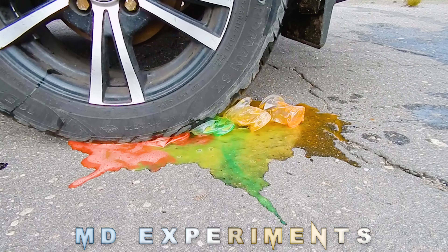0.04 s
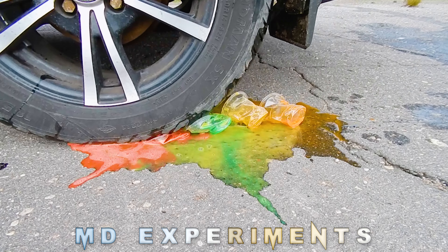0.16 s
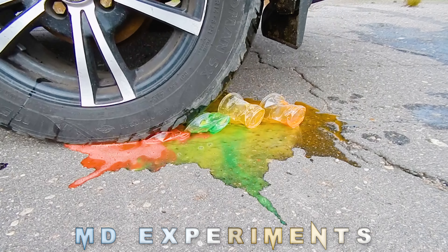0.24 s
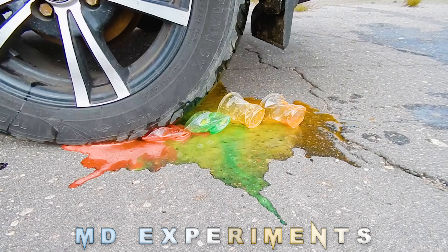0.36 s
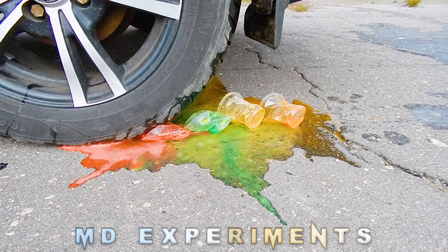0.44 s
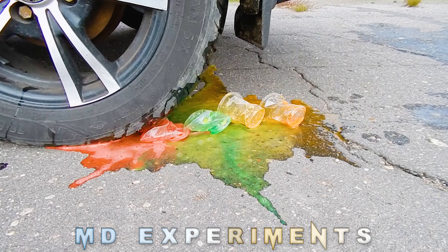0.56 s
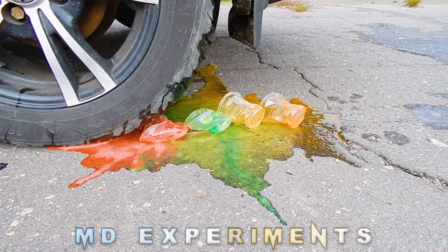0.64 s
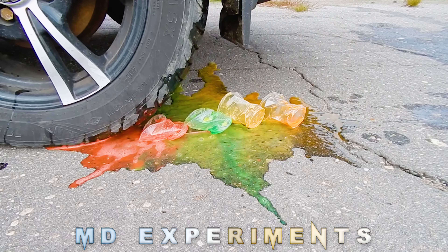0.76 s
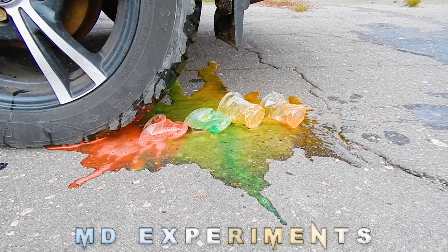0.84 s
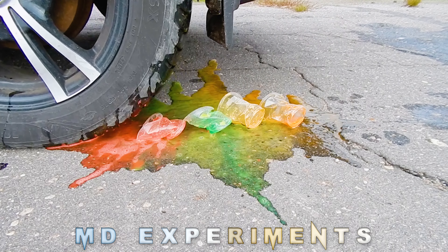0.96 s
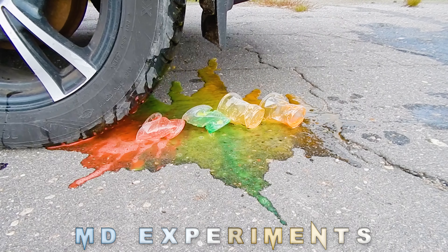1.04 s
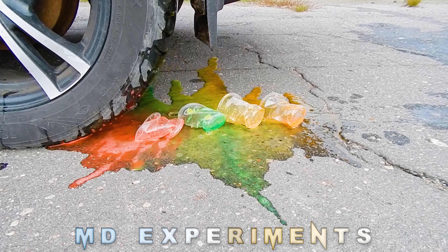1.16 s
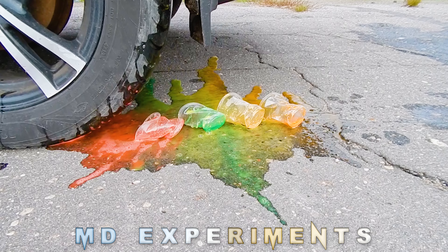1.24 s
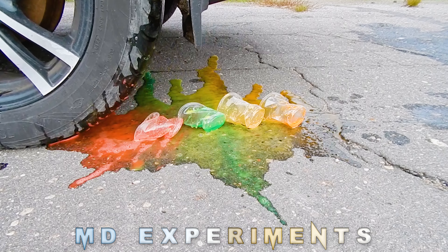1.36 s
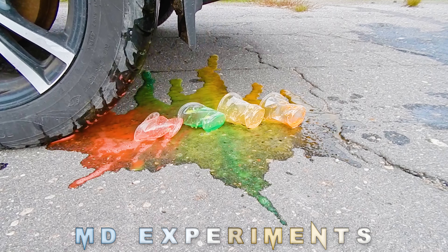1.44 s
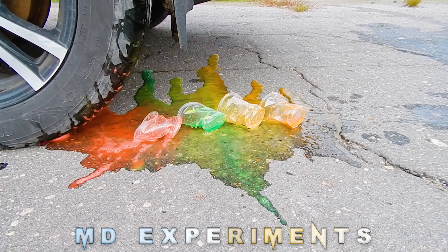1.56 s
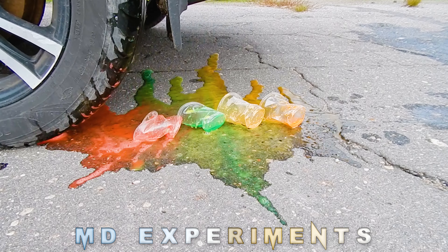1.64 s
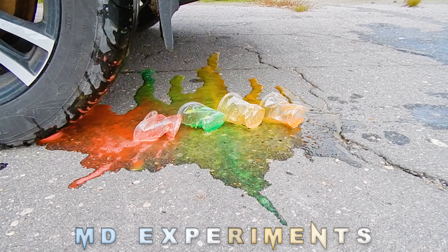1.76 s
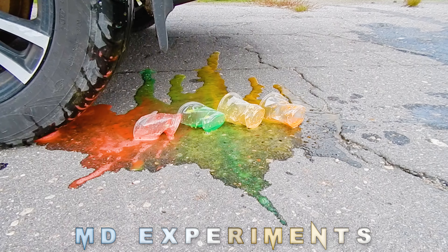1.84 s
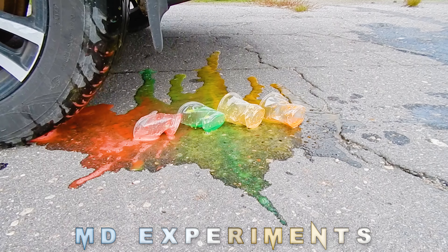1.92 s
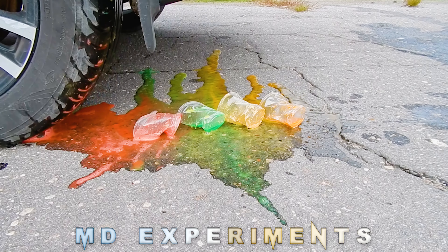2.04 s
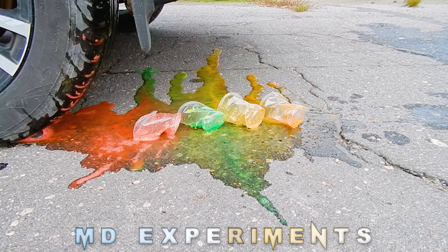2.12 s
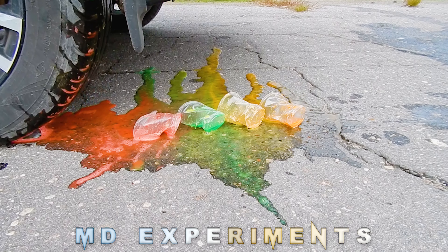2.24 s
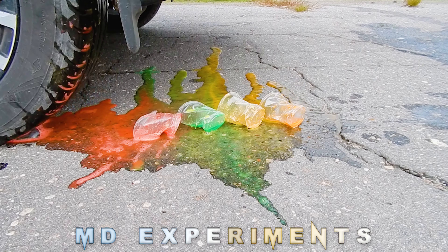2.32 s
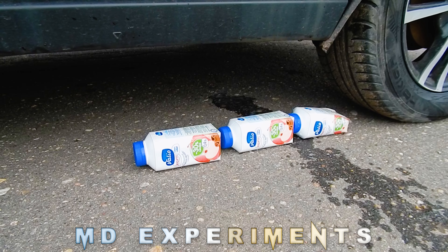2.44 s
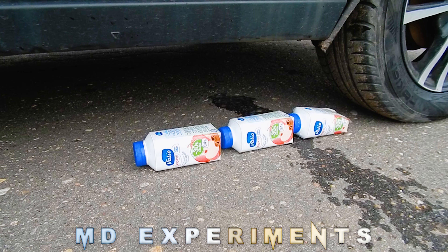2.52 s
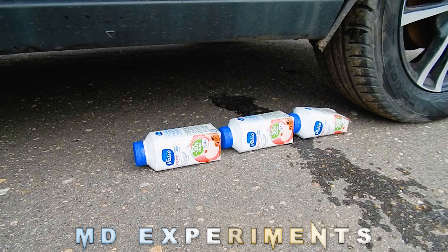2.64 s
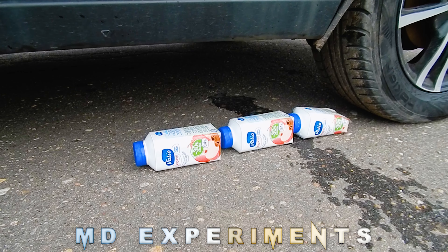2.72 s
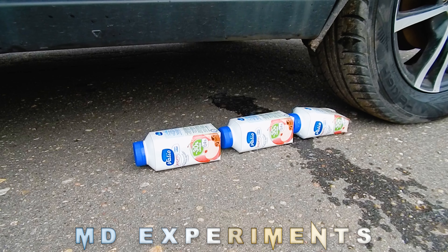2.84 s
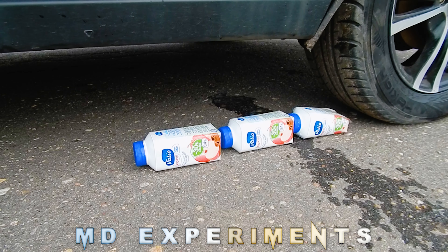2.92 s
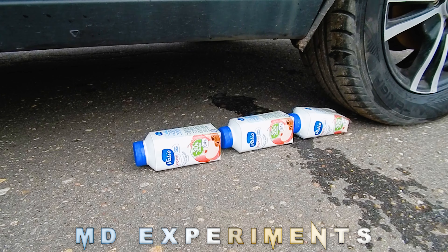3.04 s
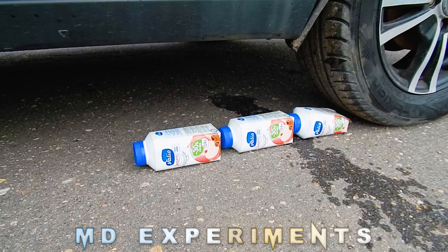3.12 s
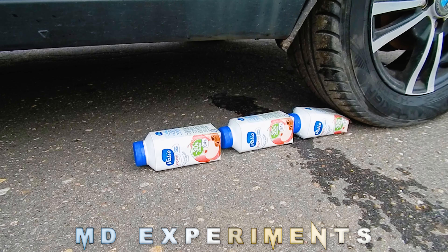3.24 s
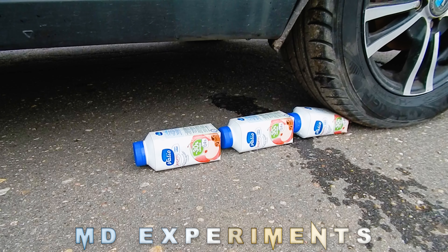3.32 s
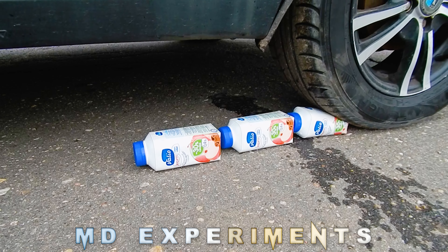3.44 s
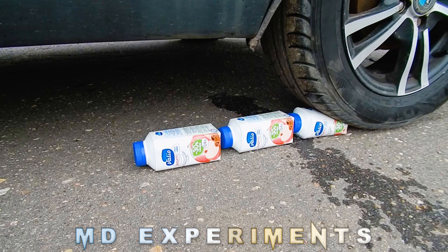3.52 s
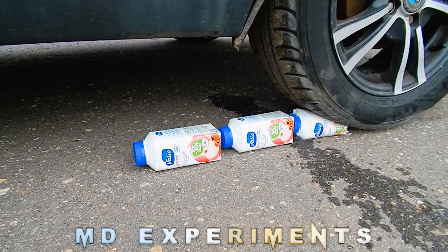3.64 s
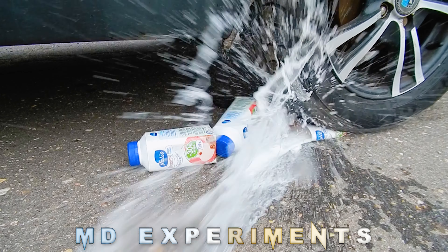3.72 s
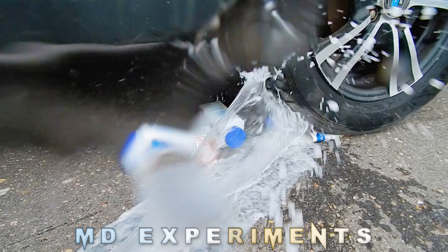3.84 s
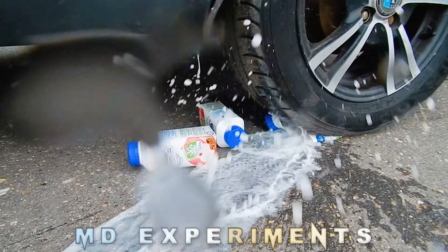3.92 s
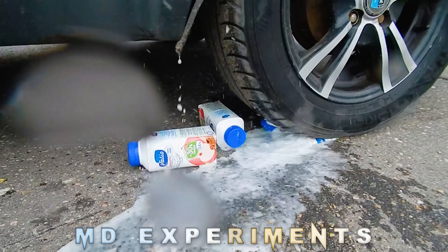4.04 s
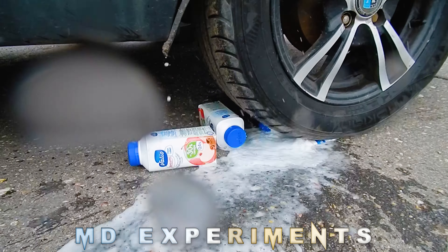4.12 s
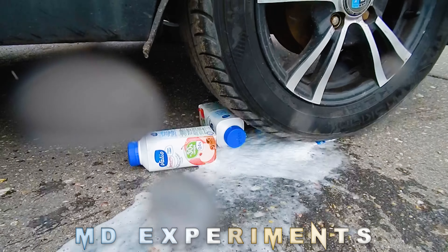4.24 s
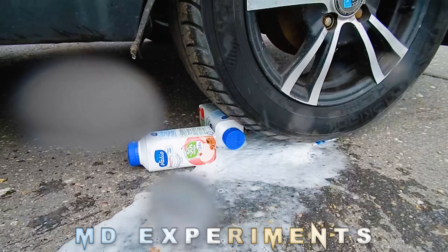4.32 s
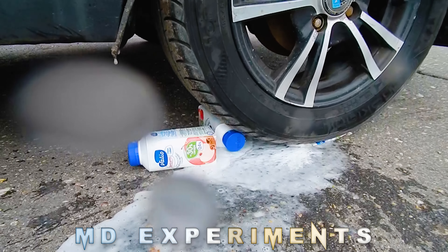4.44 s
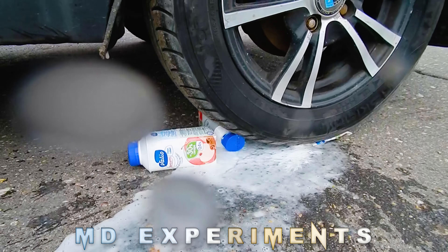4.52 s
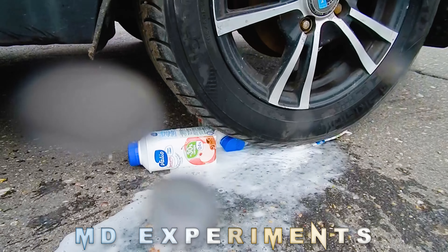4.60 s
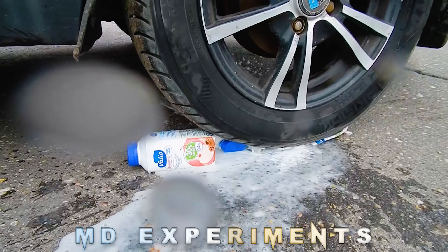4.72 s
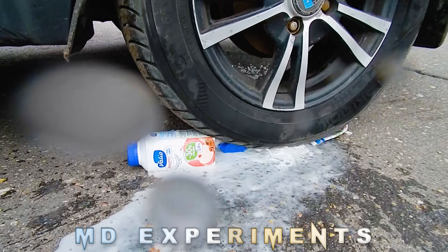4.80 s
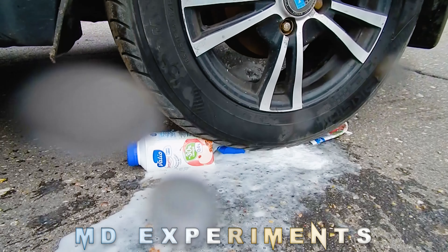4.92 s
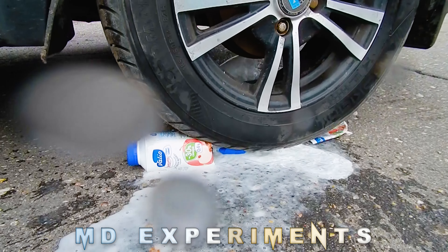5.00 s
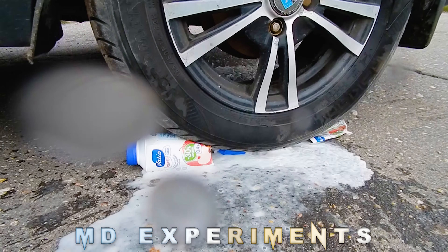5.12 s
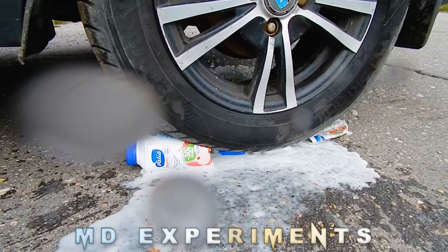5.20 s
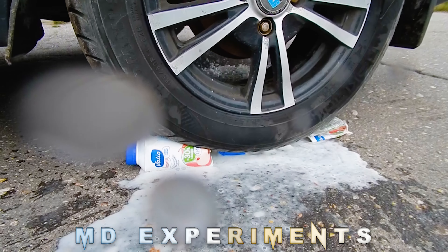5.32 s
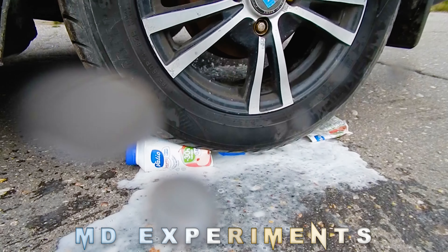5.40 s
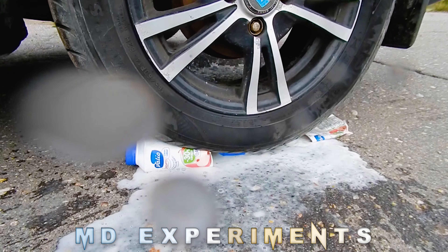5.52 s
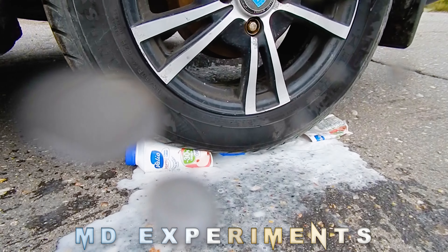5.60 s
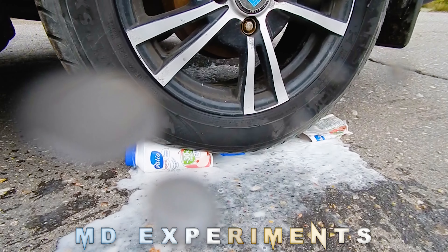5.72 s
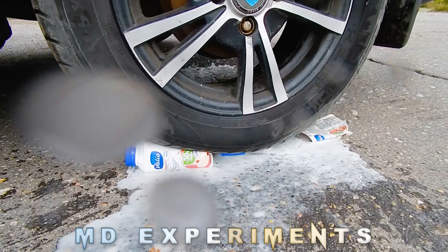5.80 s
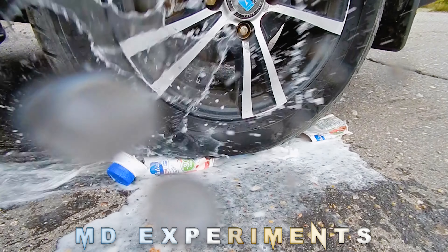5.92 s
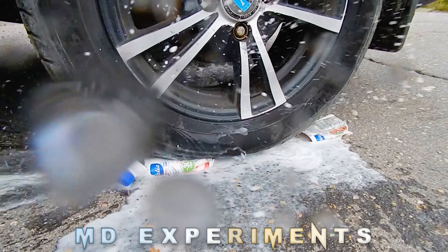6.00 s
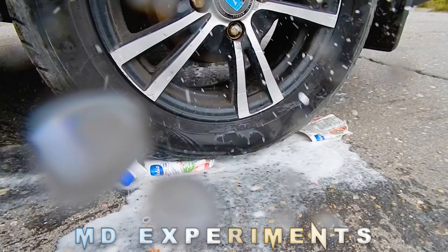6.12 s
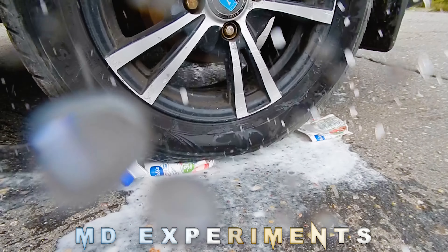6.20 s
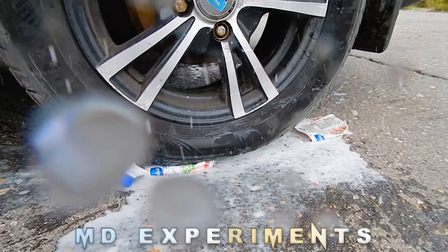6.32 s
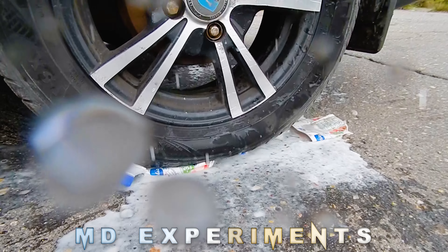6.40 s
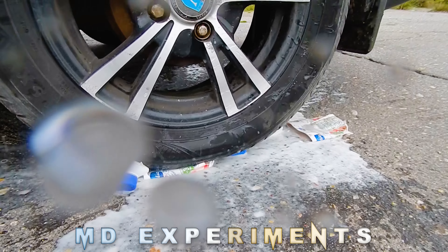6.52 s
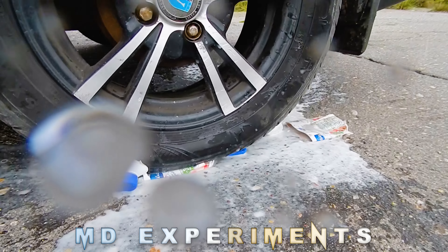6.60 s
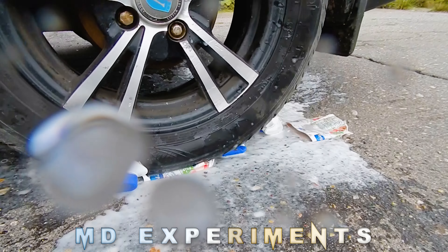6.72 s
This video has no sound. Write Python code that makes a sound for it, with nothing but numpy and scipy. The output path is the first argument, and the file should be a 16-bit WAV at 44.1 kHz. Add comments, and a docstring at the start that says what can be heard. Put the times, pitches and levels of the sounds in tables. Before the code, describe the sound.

Slow tyre beside small, thin-sounding microphones on a road. Brittle cup crunching comes first, with low air pops and light wind rumble, thinning to sparse clicks. A low engine drone swells briefly, grit ticks under the tread, then cartons give way: pressurised liquid sputters, three hollow bursts thump, drink sprays and patters down, card buckles between them, and the struck wheel rings softly before near quiet.

```python
"""Plastic cups snap and crinkle under a tyre while a breeze buffets the microphones.
A car is creeping over wet asphalt, close by; its tyre then rolls onto full drink cartons.
They creak, squirt and burst with a thump, and the drink spatters. The last burst leaves the wheel
ringing faintly. Buckles are shaped noise, drink and tyre are grainy noise, trapped air swings as a tone."""
import sys
import numpy as np
from scipy import signal
from scipy.io import wavfile
from scipy.ndimage import map_coordinates

SR = 44100
rng = np.random.default_rng(int(sys.argv[2]) if len(sys.argv) > 2 else 0)


def wrap_up_sound(samples):
    """Save the sound to the file named by the first command line argument, as 16-bit audio."""
    columns = np.atleast_2d(samples).T
    # keep every value between -1 and 1, then stretch to whole-number steps
    tamed = np.clip(columns, -1, 1)
    steps = np.round(tamed * 32767).astype(np.int16)
    wavfile.write(sys.argv[1], SR, steps)


N = 297675
TIME = np.arange(N) / SR
CUTOFF_HZ = 16000
# cups come first, cartons from here on
CARTONS_FROM_S = 2.45


def from_db(db):
    """Decibels to gain."""
    return 10 ** (np.asarray(db) / 20)


def rms_one(x):
    """Scale to an average strength (rms) of 1."""
    return x / np.sqrt(np.mean(x ** 2) + 1e-20)


def add(out, x, s):
    """Mix x into out from time s on."""
    at = max(round(s * SR), 0)
    out[..., at:at + x.shape[-1]] += x[..., :N - at]


def at_hz(points, hz):
    """Read a curve at a pitch, on a log-frequency axis."""
    f, value = np.transpose(points)
    return np.interp(np.log(hz), np.log(f), value)


def band(x, low_hz, high_hz, order=2):
    """Keep only what lies between two frequencies."""
    edges_hz = [low_hz, min(high_hz, .45 * SR)]
    return signal.sosfilt(signal.butter(order, edges_hz, "band", fs=SR, output="sos"), x)


def resonance(x, hz, width_hz):
    """One resonance with gain 1 on top; the narrower it is, the longer it rings."""
    r = np.exp(-np.pi * width_hz / SR)
    feed = np.array([1, 0, -1]) * (1 - r * r) / 2
    return signal.lfilter(feed, [1, -2 * r * np.cos(2 * np.pi * hz / SR), r * r], x)


def drift(rate):
    """A smooth random wander with spread 1, taking a new direction rate times a second."""
    knots = rng.standard_normal(4096)
    return rms_one(np.interp(TIME * rate, np.arange(len(knots)), knots))


def grains(per_s, spread_db, length_s):
    """Envelope of tiny random contacts of uneven size, each dying quickly; rms 1."""
    born = rng.random(N) < per_s / SR
    size = from_db(spread_db * np.minimum(rng.exponential(1, N), 3.5))
    power = signal.lfilter([1], [1, -np.exp(-2 / (length_s * SR))], born * size ** 2 + 1e-12)
    return rms_one(np.sqrt(power))


def noise(spectrum, likeness, excite=1, patchy_db=0):
    """Stereo noise, gated by excite; each half-octave has its level, flicker and likeness; rms 1."""
    out, edges = 0, np.geomspace(20, 18000, 21)
    white = rng.standard_normal((2, 2, N)) * excite
    for k, (low, high) in enumerate(zip(edges, edges[1:])):
        hz = np.sqrt(low * high)
        if spectrum[0][0] / 2 < hz < spectrum[-1][0] * 2:
            alike = np.clip(at_hz(likeness, hz), -.98, .98)
            gain = from_db(at_hz(spectrum, hz) + patchy_db * drift(25))
            # likeness 1 is all middle, -1 is all side
            mid_side = np.sqrt([[1 + alike], [1 - alike]])
            out = out + gain * band(white[k % 2], low, high) * mid_side
    mid, side = out
    return rms_one(np.array([mid + side, mid - side]))


def pan(pan_db):
    """Left and right gains of unchanged total power; positive leans left."""
    return rms_one(from_db([[pan_db / 2], [-pan_db / 2]]))


def widen(pair, width):
    """Scale what differs between left and right."""
    mid = pair.mean(axis=0)
    return mid + width * (pair - mid)


def place(x, lag_s):
    """The nearer microphone hears a sound a little earlier: the left one if lag_s is positive."""
    n = np.arange(len(x))
    return np.array([map_coordinates(x, [n + side * lag_s * SR / 2], order=3) for side in (1, -1)])


# higher ringing tones of a buckling wall: [f / main resonance, level/dB]
WALL_OVERTONES = [(1.7, 0.5), (2.9, 8), (4.6, 5.5)]


def wall(x, hz, wall_q=5.5, wall_db=11.0, overtone_q=22, uneven=0.12):
    """A broad main resonance and narrower overtones, which differ from one fold to the next."""
    out = x + from_db(wall_db) * resonance(x, hz, hz / wall_q)
    for multiple, db in WALL_OVERTONES:
        overtone_hz = hz * multiple * np.exp(uneven * rng.standard_normal())
        if overtone_hz < CUTOFF_HZ:
            out = out + from_db(db) * resonance(x, overtone_hz, overtone_hz / overtone_q)
    return out


# a slack wall thuds more than a stiff one, and card more than a thin cup
CUP_THUD_DB, CARD_THUD_DB, THUD_FALL_DB_PER_OCTAVE = -10, -2, 8.5
SLACK_HZ, STIFF_HZ = 826, 2426
# the wheel is a little to the left, which tells most in the treble
BODY_PAN_DB, CRACK_PAN_DB, LAG_S, LAG_SPREAD_S = 0.2, 1.5, .000035, .000015


def snap(s, level_db, wall_hz, crisp_db, tear_s=0.00077, rise_s=0.00055, flip=1.4,
         tail_db=-19, around_db=-26, tail_t60=0.061, tail_hz=6000):
    """A wall flips over in a millisecond and rings; asphalt and underbody throw it back, duller."""
    t = np.arange(4096) / SR
    # a crease runs through the wall, with one sharp flip half a millisecond in
    tear = rng.standard_normal(len(t)) * np.exp(-t / tear_s) * (1 - np.exp(-t / rise_s))
    tear[SR // 2000] += flip
    ground = round(rng.uniform(.0009, .0017) * SR)
    tear = tear + .45 * np.pad(tear, (ground, 0))[:len(t)]

    scatter = band(rng.standard_normal((3, len(t))), 570, tail_hz, order=1)
    scatter = scatter * from_db(-60 * t / tail_t60)
    lag_s = LAG_S + LAG_SPREAD_S * rng.standard_normal()
    pair = place(tear + from_db(tail_db) * scatter[0], lag_s) + from_db(around_db) * scatter[1:]
    rung = wall(pair, wall_hz)

    # only a stiff wall colours the crack; slack walls sound duller
    crack = rung if wall_hz > 4000 else pair
    body_top_hz = np.clip(1.69 * wall_hz, 2200, 3600)
    thud_db = CUP_THUD_DB if s < CARTONS_FROM_S else CARD_THUD_DB
    thud_db = thud_db - THUD_FALL_DB_PER_OCTAVE * np.log2(min(wall_hz, STIFF_HZ) / SLACK_HZ)
    thud = band(rung, 290, 570)
    body = pan(BODY_PAN_DB) * band(rung, 863, body_top_hz)
    crack = pan(CRACK_PAN_DB) * band(crack, 4000, 11300, order=3)

    # each level is the rms of the first hundredth of a second
    heard = SR // 100
    out = 0
    for db, part in [(thud_db, thud), (0, body), (crisp_db, crack)]:
        out = out + from_db(level_db + db) * part / np.sqrt(np.mean(part[:, :heard] ** 2))
    return out


def cavity(s, level_db, hz, swell_s, t60, rise=0.13, rise_s=0.003):
    """A pocket of air swings as it gives way, strongest at s, its pitch rising as it collapses."""
    out, t = np.zeros((2, N)), np.arange(SR // 5) / SR
    age = t - 2 * swell_s
    swell = np.sin(np.pi / 4 * t / swell_s) ** 2
    envelope = np.where(age < 0, swell, from_db(-60 * np.abs(age) / t60))
    flutter = 1 + .35 * rms_one(band(rng.standard_normal(len(t)), hz / 10, hz / 2))
    phase = 2 * np.pi * np.cumsum(hz * (1 - rise * np.exp(-t / rise_s))) / SR
    # the slow puffs of air reach the two microphones a little out of step
    apart = np.array([[-1], [1]]) * min(60 / hz, .3)
    add(out, from_db(level_db) * envelope * flutter * np.sin(phase + apart), s - 2 * swell_s)
    return out


# the tyre's pass over the cups and its pass over the cartons, before each layer's own boost:
# [t/s, bass level/dB, tread level/dB, wet hiss level/dB];
# the bass is the breeze during the first pass and the tyre's rumble during the second
CUP_PASS, CARTON_PASS = [
    [(0.0, -52.5, -42, -62.5), (0.33, -56, -48, -61), (0.46, -92, -48.5, -66), (0.63, -61.5, -53.5, -65),
     (0.89, -68.5, -63, -77), (1.2, -69, -56, -71), (1.51, -67.5, -54.5, -67.5), (1.62, -64, -49.5, -69.5),
     (2.09, -50.5, -50, -60), (2.45, -66, -53.5, -63.5)],
    [(2.46, -57, -54.5, -61), (3.18, -64, -61, -63.5), (3.75, -57, -53.5, -56), (4.22, -78.5, -70, -70.5),
     (4.51, -58, -64, -66.5), (4.8, -58.5, -46.5, -51.5), (5.37, -69.5, -62.5, -57), (5.89, -62, -64.5, -61),
     (6.33, -78.5, -76, -77.5), (6.75, -76, -62, -63.5)],
]
# colour of the bass, breeze and tyre alike: [f/Hz, relative level/dB per Hz of bandwidth]
RUMBLE = [(20, -27), (45, -2), (85, -7), (160, 1.5), (260, -4.5), (450, -18), (900, -43.5)]


def wind(wind_db=6.5, gust_db=3.5, gusts_per_s=9):
    """While the cups are crushed a breeze buffets each microphone almost on its own."""
    s, level_db, *_ = np.transpose(CUP_PASS)
    gusts = rms_one(from_db(gust_db * np.array([drift(gusts_per_s), drift(gusts_per_s)])))
    level = (TIME < CARTONS_FROM_S) * from_db(wind_db + np.interp(TIME, s, level_db))
    return level * gusts * noise(RUMBLE, [(60, 0.088), (500, .2)], patchy_db=4.0)


# engine drone from under the sill, before its boost: [t/s, level/dB]
ENGINE = [(0.0, -73), (1.05, -70), (2.31, -51.5), (3.82, -70), (4.04, -77), (4.42, -75), (4.7, -60),
          (6.54, -74), (6.75, -79)]


def engine(drone_hz=85, width_hz=38, drone_db=1.0):
    """A muffled, uneven drone: noise through the same low resonance twice."""
    s, level_db = np.transpose(ENGINE)
    drone = resonance(rng.standard_normal((2, N)), drone_hz, width_hz)
    mid, side = rms_one(resonance(drone, drone_hz, width_hz))
    level = from_db(drone_db + np.interp(TIME, s, level_db))
    return level * (mid + .25 * side * np.array([[1], [-1]]))


# colour of the crunching tread: [f/Hz, relative level/dB per Hz of bandwidth]
TREAD = [(150, -1.5), (350, -10), (750, 2.5), (1500, 0.5), (2300, -6), (4000, -31), (8000, -50.5)]
# colour of the wet film: [f/Hz, relative level/dB per Hz of bandwidth]
HISS = [(1500, -10), (3000, 3.5), (6000, -2), (10000, 1), (12500, -6), (16000, -13)]
# how alike left and right are in spread-out sound: [f/Hz, likeness from -1 to 1]
LIKENESS = [(60, 0.0024), (600, 0.82), (1400, 0.32), (3000, -0.39), (15000, 0.19)]
# how far away the tyre is; the further, the wider its tread and hiss: [t/s, distance/m]
DISTANCE = [(0, 0.33), (1.3, 0.97), (2.3, 1.15), (3.5, 1.1), (4.2, 0.35), (6.75, 0.68)]
SPREAD_OUT_AT_M = 1.0


def tyre(rumble_db=4.5, tread_db=2.0, hiss_db=5.0, hiss_width=.5):
    """The tyre rumbles over the cartons, grit crunches under the tread and the wet film fizzes."""
    s, *levels = np.transpose([*CUP_PASS, *CARTON_PASS])
    rumble, tread, hiss = [from_db(np.interp(TIME, s, level)) for level in levels]
    width = np.interp(TIME, *np.transpose(DISTANCE)) / SPREAD_OUT_AT_M
    bass = noise(RUMBLE, [(40, 1.0), (120, 0.96)], patchy_db=4.5)
    crunch = noise(TREAD, LIKENESS, grains(2500, 4.2, 0.0016), patchy_db=3.2)
    fizz = noise(HISS, LIKENESS, grains(3100, 1.0, 0.0016), patchy_db=4.0)
    return (rumble * (TIME > CARTONS_FROM_S) * from_db(rumble_db) * bass
            + tread * from_db(tread_db) * widen(crunch, width)
            + hiss * from_db(hiss_db) * widen(fizz, width ** hiss_width))


def grit(per_s=16, over_hiss_db=2.5, size_db=2.0, ring_hz=2600, crisp_db=1.0):
    """Stones and scraps tick under the tread, as small snaps whose level follows the wet film."""
    out = np.zeros((2, N))
    times, *_, hiss_db = np.transpose([*CUP_PASS, *CARTON_PASS])
    for slot in np.arange(0, N / SR - 2 / per_s, 1 / per_s):
        s = slot + rng.random() / per_s
        size, pitch = rng.uniform(-1.2, 1, 2)
        level_db = np.interp(s, times, hiss_db) + over_hiss_db + size_db * size
        add(out, snap(s, level_db, ring_hz * 2 ** pitch, crisp_db), s)
    return out


# spells in which the tread folds a wall: [t/s, length/s, crinkle level/dB, centre f/Hz]
CRUNCHES = [(0.035, 0.44, -47, 1330), (1.711, 0.087, -54.5, 1750), (3.409, 0.071, -53.5, 1410),
            (4.717, .125, -50.5, 730), (4.904, 0.055, -47, 790), (4.978, 0.204, -49, 2380),
            (5.295, 0.2, -56.5, 3200), (6.578, 0.13, -53.5, 1890)]


def crinkle(breadth=0.34, spread=0.091, crisp_db=-21, surge_db=6.0):
    """Tiny creases tick in surges and sound through the broad resonance of the wall."""
    out = np.zeros((2, N))
    mid, side = rng.standard_normal((2, N)) * grains(380, 3.5, .0006)
    creases = np.array([mid + spread * side, mid - spread * side]) * from_db(surge_db * drift(35))
    for s, length_s, db, hz in CRUNCHES:
        start, count = round(s * SR), round(length_s * SR)
        ticks = creases[:, start:start + count]
        rung = resonance(ticks, hz, hz * breadth) + from_db(crisp_db) * ticks
        run = band(rung, hz / 4, 6500)
        fade = signal.windows.tukey(run.shape[1], .15)
        add(out, from_db(db) * rms_one(run * fade), s)
    return out


# small buckles within those spells: rate, level over the spell, scatter
BUCKLES_PER_S, BUCKLE_DB, BUCKLE_CRISP_DB, BUCKLE_SPREAD_DB, BUCKLE_SPREAD_OCTAVES = 22, 2.5, 1, 2, 0.88


def buckles():
    """While a wall is being folded, small patches of it snap at uneven intervals."""
    out = np.zeros((2, N))
    for start, length_s, db, hz in CRUNCHES:
        for slot in np.arange(start, start + length_s, 1 / BUCKLES_PER_S):
            s = slot + rng.random() / BUCKLES_PER_S
            size, pitch = rng.standard_normal(2)
            level_db = db + BUCKLE_DB + BUCKLE_SPREAD_DB * size
            wall_hz = hz * 2 ** (BUCKLE_SPREAD_OCTAVES * np.clip(pitch, -2, 2))
            sound = snap(s, level_db, wall_hz, BUCKLE_CRISP_DB)
            # none starts after the spell is over
            add(out, sound * (s < start + length_s), s)
    return out


def spell(s, length_s, swell_s=0.0098, swell_share=0.12, fade_s=0.028):
    """A squirt swells, the more slowly the longer it lasts, holds and dies away."""
    rise_s = swell_s + swell_share * length_s
    rise = np.clip((TIME - s) / rise_s + .5, 0, 1)
    fall = np.clip((s + length_s - TIME) / (2 * fade_s) + .5, 0, 1)
    return (rise * fall) ** 1.5


# drink squirting through a split seam: [t/s, length/s, starting level/dB]
JETS = [(1.22, .1, -47), (3.63, .2, -30), (4.616, 0.043, -38), (4.676, 0.021, -32), (4.999, 0.029, -35.5),
        (5.37, 0.137, -44), (5.582, .14, -29), (5.945, 0.023, -27.5)]
# colour of a jet: [f/Hz, relative level/dB per Hz of bandwidth]
JET = [(200, -11.5), (600, 1.5), (1300, -1), (3000, -1.5), (5000, 1.5), (7500, 3.5), (10500, 1),
       (13000, 7.5), (16000, -18)]
# how alike left and right are in the jets: [f/Hz, likeness from -1 to 1]
JET_LIKENESS = [(600, 0.95), (1400, 0.7), (3000, 0.21), (7000, 0.053), (15000, -0.37)]
# colour of the spatter: [f/Hz, relative level/dB per Hz of bandwidth]
SPLASH = [(100, 1.5), (400, 7), (1100, 4.5), (2000, -9), (4000, -12), (9000, -20), (16000, -20)]
JET_SAG_DB_PER_S, JET_PAN_DB = 68.5, .5  # a jet weakens as the pressure falls


def drink(sputter_db=-0.1, surge_db=4.0, spatter_lag_s=0.002, spatter_t60=.13):
    """Jets sputter and sizzle as they break into droplets; each burst rains spatter on car and road."""
    flow = 0
    for s, length_s, db in JETS:
        flow = flow + spell(s, length_s) * from_db(db - JET_SAG_DB_PER_S * np.abs(TIME - s))
    sizzle = noise(JET, JET_LIKENESS, grains(1800, 3.2, .0006), patchy_db=.6)
    unsteady = from_db(sputter_db * drift(130) + surge_db * drift(30))
    jets = flow * pan(JET_PAN_DB) * unsteady * sizzle

    spatter = 0
    for s, *_, db in BURSTS:
        spatter = spatter + (TIME > s + spatter_lag_s) * from_db(db - 60 * np.abs(TIME - s) / spatter_t60)
    splash_likeness = [(600, 0.99), (2000, 0.76), (8000, 0.13)]
    return jets + spatter * noise(SPLASH, splash_likeness, grains(1200, 1.8, 0.00053), patchy_db=0.0)


def droplets(fall_s=.1, linger_s=0.043, under_spatter_db=-34):
    """Drink thrown up by a burst patters back down a moment later."""
    shower = 0
    for s, *_, db in BURSTS:
        bump = np.exp(-((TIME - s - fall_s) / linger_s) ** 2 / 2)
        shower = shower + from_db(db + under_spatter_db) * bump
    return shower * noise(JET, LIKENESS, grains(990, 1.6, .0008), patchy_db=7.0)


# wheel struck by the last burst: [f/Hz, level/dB, time to fall by 60 dB/s]
WHEEL = [(248, -54, .5), (700, -68, 2.2), (1017, -58, 1.2), (1249, -64, .9), (1470, -65, .5),
         (1701, -71, 1.6)]


def wheel():
    """The metal rings on after the last burst, as a handful of fading pure tones."""
    age = np.maximum(TIME - BURSTS[-1][0], 0)
    return sum(from_db(db - 60 * age / t60) * np.sin(2 * np.pi * hz * age) for hz, db, t60 in WHEEL)


# puffs of breeze on the microphones and pockets of trapped air giving way: # [t/s, level/dB, cavity f/Hz, left
# over right/dB]
POPS = [(0.352, -34, 218, 1), (.449, -20.5, 171, 28), (1.171, -33, 553, 0), (2.128, -33.5, 154, 0),
        (2.519, -37, 625, 3), (3.912, -38, 720, 0), (3.969, -38.5, 350, 6), (4.4661, -20.5, 810, 0),
        (6.622, -42.5, 220, 0)]
POP_SWELL_CYCLES, POP_T60_CYCLES = 0.468, 18.8


def pops():
    """Puffs of breeze and trapped air giving way: lower ones swell more slowly and last longer."""
    out = 0
    for s, db, hz, pan_db in POPS:
        out = out + pan(pan_db) * cavity(s, db, hz, POP_SWELL_CYCLES / hz, POP_T60_CYCLES / hz)
    return out


# the louder buckles of plastic and card:
# [t/s, body level/dB, wall resonance f/Hz, crack over body/dB]
SNAPS = [(0.0128, -48.5, 4380, 10), (0.023, -42.5, 1820, 4), (.059, -47, 1000, 8),
         (0.1005, -22, 1380, -3.5), (.1485, -30, 833, -7.5), (0.178, -35.5, 2230, -27),
         (.192, -38, 960, -2), (0.2269, -28.5, 1060, -6.5), (0.234, -30.5, 894, -8), (0.247, -46, 1720, -7),
         (0.3003, -33, 4320, -5), (0.3136, -29.5, 1880, -26), (.3528, -32.5, 830, -10),
         (0.3775, -25.5, 1770, -8.5), (0.4107, -31, 2220, -2.5), (0.4566, -32, 930, -13),
         (0.493, -26, 916, -1.5), (0.5013, -30, 2050, 2), (.5369, -41, 6300, 10.5), (0.616, -36, 1660, -7),
         (.6313, -27.5, 1040, -7), (0.661, -30.5, 1900, -8), (0.769, -36.5, 1390, 7),
         (0.845, -50.5, 2830, -10), (0.89, -45, 1880, 1), (.9168, -48, 6840, 4), (0.954, -45.5, 2200, -27),
         (1.0459, -41, 5550, 4.5), (1.1162, -43.5, 1280, -11), (1.1702, -35, 1600, 6.5),
         (1.299, -35.5, 1360, -2), (1.4177, -38, 1860, -13), (1.5561, -23.5, 3450, -0.5),
         (1.5879, -46.5, 760, -9), (2.0273, -24.5, 1870, -6), (2.0797, -37, 1460, -33),
         (2.5944, -44, 4120, 13), (3.1403, -47.5, 2170, -17), (3.4229, -43.5, 1883, -4.5),
         (3.7842, -35, 1970, -23), (3.9574, -55, 5500, 11.5), (4.0752, -51, 800, -2),
         (4.1571, -36, 1080, -7), (4.2588, -38.5, 820, -5), (4.2869, -38.5, 776, 1),
         (4.4935, -21.5, 2520, -7), (4.6095, -35.5, 854, -13), (4.749, -29, 815, -5.5),
         (4.8192, -44, 7700, 16.5), (4.887, -37, 2150, 1.5), (5.0899, -57.5, 2120, 18),
         (5.126, -42, 1160, -6), (5.156, -34.5, 2030, 5.5), (5.293, -39.5, 990, -4),
         (5.3774, -39, 3230, 3.5), (5.4057, -37, 3270, 3), (5.7889, -48.5, 5460, 12),
         (5.8573, -23, 1420, -7), (5.9224, -31.5, 5630, 10), (6.429, -46, 1574, -9),
         (6.5592, -49, 1813, -6.5), (6.6194, -36, 1545, -9.5)]


def snaps():
    """The loud single buckles of cups and cartons."""
    out = np.zeros((2, N))
    for s, *event in SNAPS:
        add(out, snap(s, *event), s)
    return out


# cartons bursting: [t/s, level/dB, cavity f/Hz, time to fall by 60 dB/s,
# overtone tilt/dB per octave, air puff level/dB, spatter level/dB]
BURSTS = [(3.8077, -7.5, 542, 0.0089, -19.5, -7, -27), (4.6855, -16.5, 433, .05, -16.5, -31.5, -20.5),
          (5.9608, -8.5, 506, 0.056, 7, -18.5, -19)]
# ringing tones of a bursting carton, before the tilt: [f / cavity pitch, level/dB]
CARTON = [(1, 0), (1.459, 3), (2.02, -14)]


def bursts(puff_lead_s=0.002, ring_lag_s=0.0016, tear_db=-11, thump_db=-26, thump_lag_s=.015):
    """Air puffs out, the seam tears, the carton rings and the tyre drops onto the road."""
    out = np.zeros((2, N))
    multiples, mode_db = np.transpose(CARTON)
    for s, db, hz, t60, tilt_db, puff_db, _ in BURSTS:
        out += cavity(s - puff_lead_s, puff_db, hz=171.3, swell_s=0.0025, t60=t60)
        add(out, snap(s, db + tear_db, wall_hz=1090, crisp_db=-10.5), s)
        # the strongest tone gets the full level of the burst
        tilted_db = mode_db + tilt_db * np.log2(multiples)
        for multiple, share_db in zip(multiples, tilted_db - tilted_db.max()):
            out += cavity(s + ring_lag_s, db + share_db, hz * multiple, swell_s=0.001527, t60=t60)
        out += cavity(s + thump_lag_s, db + thump_db, hz=80, swell_s=0.0064, t60=.21)
    return out


def scene():
    """Breeze and car, then the crushed cups and cartons, all added together."""
    background = wind() + engine() + tyre() + grit()
    folding = crinkle() + buckles()
    liquid = drink() + droplets()
    return background + folding + liquid + wheel() + pops() + snaps() + bursts()


def record(dry, hollow_hz=3700, hollow=0.19, low_hz=36, top_hz=13500, ceiling=1.0,
           bright_hz=11500, bright=0.34):
    """Small microphones: thin bass, hollow low treble, soft top brighter on the left, rounded peaks."""
    heard = dry - hollow * resonance(dry, hollow_hz, hollow_hz / 2)
    heard = heard + bright * resonance(heard, bright_hz, bright_hz / 3) * np.array([[1], [-1]])
    heard = ceiling * np.tanh(band(heard, low_hz, top_hz) / ceiling)
    # almost nothing is left above the cutoff
    return signal.sosfilt(signal.ellip(10, .2, 80, CUTOFF_HZ, fs=SR, output="sos"), heard)


dry = scene()
out = record(dry)
wrap_up_sound(out)
```